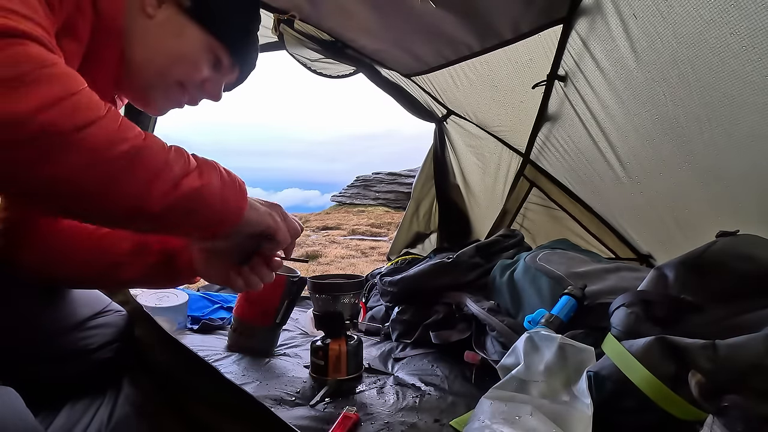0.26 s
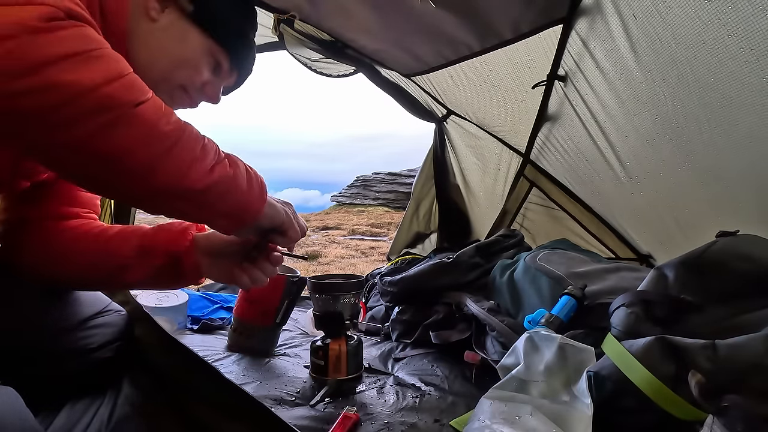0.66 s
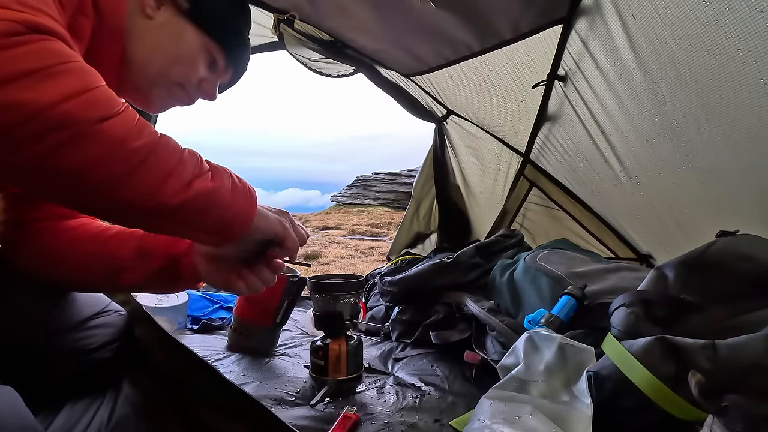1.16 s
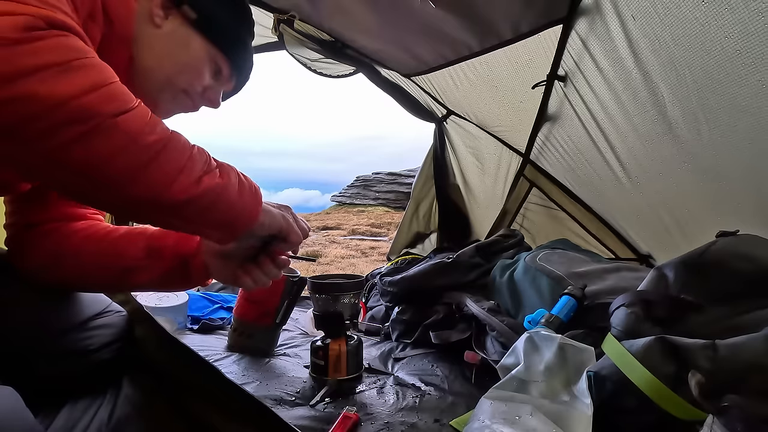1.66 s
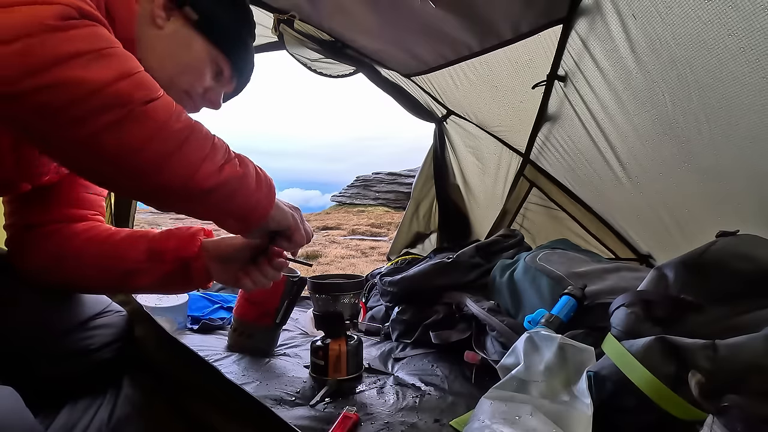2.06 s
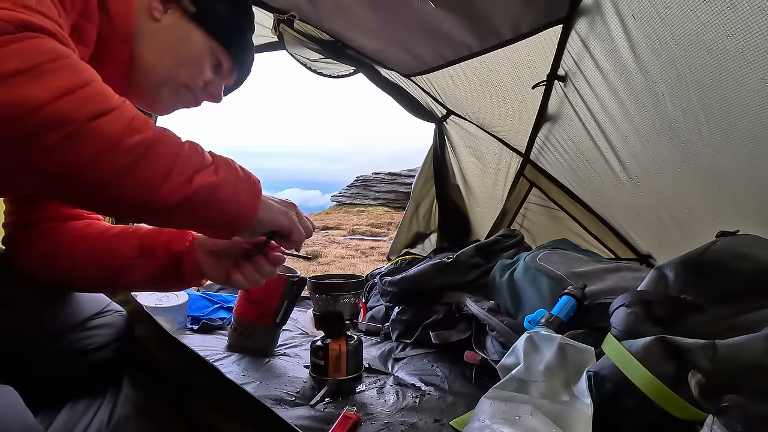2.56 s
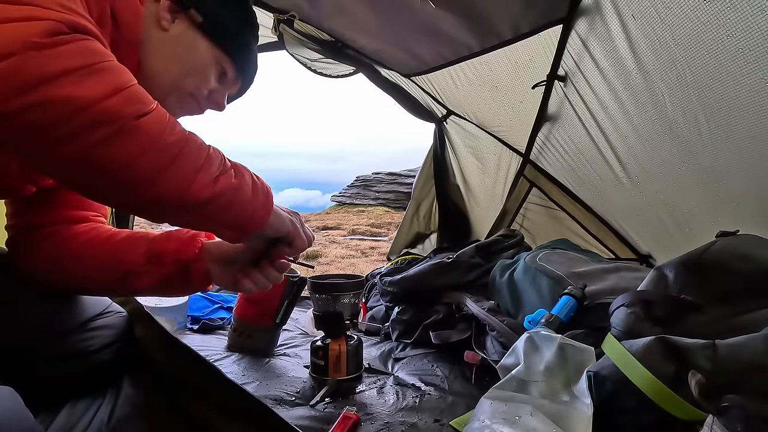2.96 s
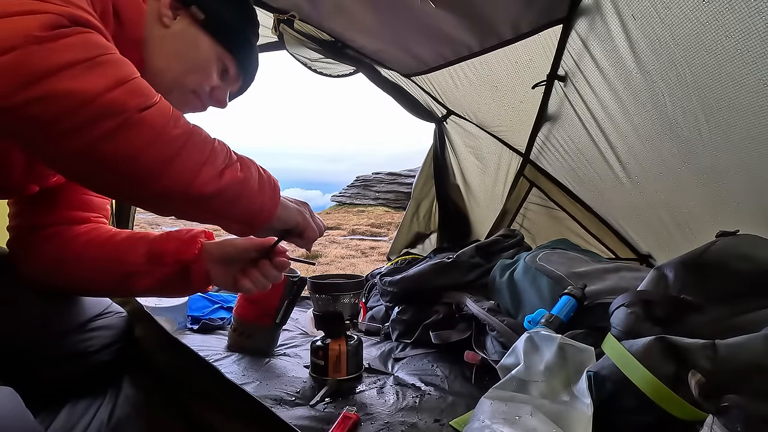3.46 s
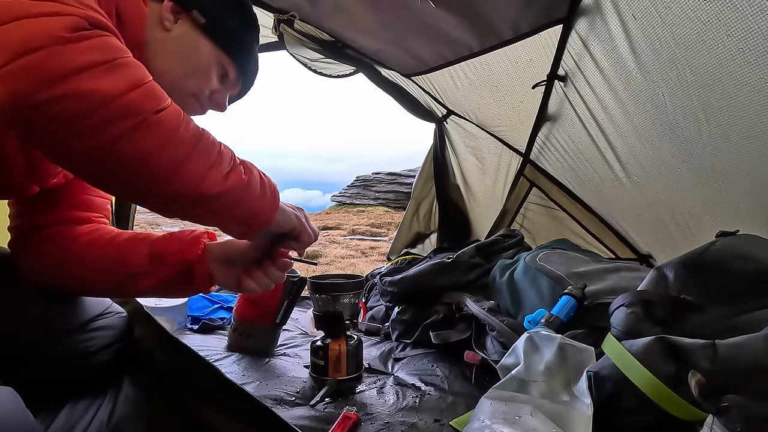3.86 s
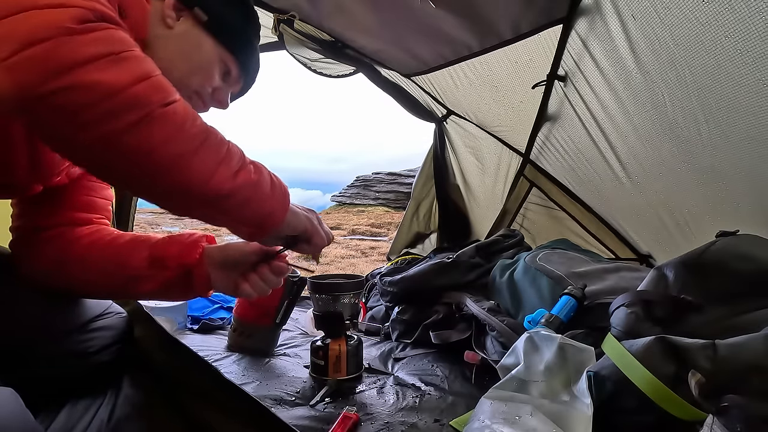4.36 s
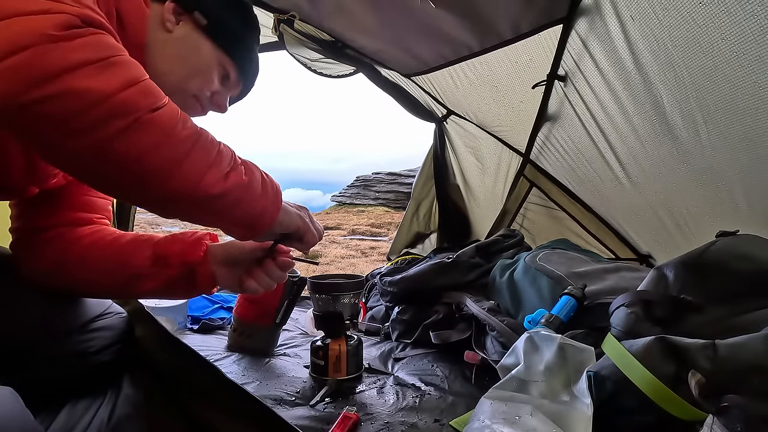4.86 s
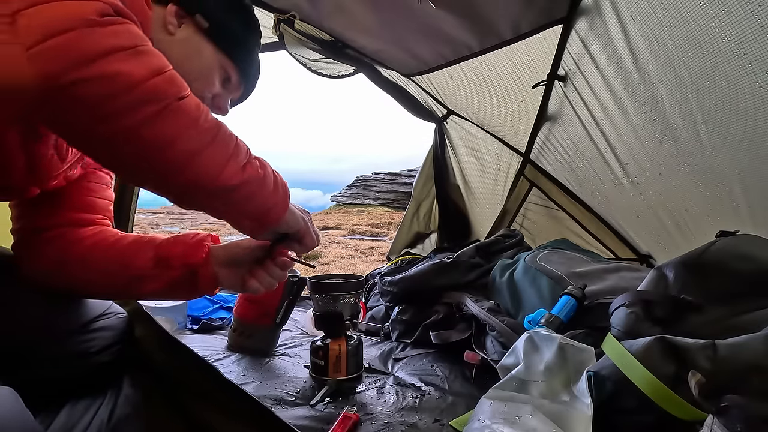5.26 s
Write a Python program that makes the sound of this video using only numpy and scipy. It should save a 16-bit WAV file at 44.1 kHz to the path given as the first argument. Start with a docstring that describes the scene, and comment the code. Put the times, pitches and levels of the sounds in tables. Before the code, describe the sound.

A close, dry recording in a small tent. Faint steady hiss, like escaping gas with a slightly whistly colour around five kilohertz, runs throughout, over weak low wind rumble and soft drumming fabric that rise and fall. A tiny click comes at 0.3 s. At 0.77 s a striker scrapes a rod for about a tenth of a second: a rough, chattering metallic zip with grit. Knocks follow at 1.3 s, with a faint one at 1.9 s. A harsher, very short scrape comes at 2.3 s, then a clear steel tick at 2.8 s. Light ticks lead into the third scrape at 3.3 s, which ends in a bright, loud snap at 3.38 s. A small tick sounds at 3.7 s. The fourth scrape, at 4.3 s, is softer and peppered with clicks; handling ticks follow at 4.8 and 5.06 s. The last, strong gritty scrape at 5.44 s ends with the loudest crack at 5.49 s.

```python
"""Ferro rod scraped over an unlit burner

A steel striker scrapes five times along a ferro rod in a tent: stick-slip friction rings the pressed steel,
fracture of the rod throws off grit, and the burning shavings puff as sparks.
Knocks, before, during and after the strokes, are impulses that ring damped modes of striker and rod.
Gas hisses throughout as jet noise coloured by resonances, and wind rumbles and drums on the tent."""
import sys
import numpy as np
from scipy import signal
from scipy.fft import rfft, irfft
from scipy.io import wavfile

SR = 44100
rng = np.random.default_rng(int(sys.argv[2]) if len(sys.argv) > 2 else 0)


def generate_wav(sig):
    """Save sig (samples, or channels by samples) to the path in sys.argv[1] as 16-bit PCM at SR."""
    pcm = np.round(np.clip(np.atleast_2d(sig).T, -1, 1) * 32767).astype(np.int16)
    wavfile.write(sys.argv[1], SR, pcm)


N = 242550
TIME = np.arange(N) / SR
BINS = np.maximum(np.arange(N // 2 + 1) * SR / N, 1)   # bin frequencies in Hz, kept above 0 for the logarithm

# a stroke bites, gathers speed and loses pressure; levels are relative within each layer:
# (start [s], share of full speed at the bite [0-1], full speed [s], easing off [s],
#  time for the pressure to fall 20 dB [s], chatter [dB], centre of the chatter at full speed [Hz],
#  grit [dB], flare [dB])
STROKES = [(0.769, .27, 0.825, 0.875, 0.0327, -28.5, 2120, -38, -48.5),
           (2.281, .21, 2.328, 2.335, 0.012, -21.5, 2400, -26, -37),
           (3.293, .29, 3.346, 3.3773, 0.0009, -26, 2270, -31.5, -43.5),
           (4.311, .45, 4.346, 4.384, 0.07, -30.5, 2380, -39, -45),
           (5.444, .48, 5.488, 5.46, 0.12, -21.5, 2340, -22.5, -38.5)]
# the edge catches hard and lets go: (time [s], relative level [dB], pitch of the ring [Hz], swell [s])
CATCHES = [(0.816, -23.5, 2080, .0019), (0.8425, -22, 2000, .0012), (0.8637, -16.5, 2170, .001),
           (0.870, -24, 2520, .0014), (0.911, -30, 2290, .0011), (2.3265, -14, 2340, .0016),
           (2.3316, -8.5, 2420, .0014), (4.2985, -26.5, 2400, .0007), (4.3383, -23, 2150, .0008),
           (5.4492, -22.5, 2393, .0007), (5.4814, -18, 2310, .002)]
# steel knocks on the rod, or snaps off its tip:
# (time [s], relative level [dB], place from shaft to tip [0-1], brightness [dB per octave])
KNOCKS = [(0.2897, -33, .3, -8), (0.8748, -26.5, 0.91, 11), (1.279, -26, .1, 1), (1.3192, -17.5, .8, -1),
          (1.8714, -35, 0.094, -10.5), (2.827, -13, 0.051, 1.5), (2.9075, -27.5, .05, 2),
          (3.2432, -30, .1, -6.5), (3.2661, -26.5, .1, -6), (3.337, -15, .1, 0.5), (3.3813, -3, 0.852, 2.5),
          (3.7323, -28, .3, -1), (4.3289, -16, .1, -3.5), (4.3455, -18.5, .1, -1.5),
          (4.3569, -17.5, 0.049, -1), (4.374, -19.5, 0.0514, 6), (4.4283, -28, .2, 7),
          (4.819, -29, 0.0508, 4), (5.0624, -20, .35, -6.5), (5.4406, -24, .1, -3),
          (5.4919, -1.5, 0.983, -2)]
# modes of striker and rod, damped by the fingers: (frequency [Hz], relative level [dB], decay by 60 dB [s])
STEEL_MODES = [(1865, 2.5, 0.00556), (2297, -1, 0.0134), (2681, -1, 0.00697), (3618, 4.5, 0.0098),
               (4166, 5, 0.0062), (5258, 4.5, 0.00497), (6050, 2.5, 0.00625), (7110, 0.5, 0.0206),
               (7388, 3, 0.00827), (8637, -0.5, 0.00707), (9960, -13, .008)]
# resonances of the striker pressed on the rod: (frequency [Hz], width [Hz], relative level [dB])
PRESSED_MODES = [(1836, 248, -6), (2112, 157, 0), (2282.5, 158, -0.5), (2556.6, 100, 0.5), (2955, 85, -2)]
# relative level of a knock's ring in four bands, near 2, 4, 5.5 and 8 kHz, on the shaft and at the tip: (level [dB])
SHAFT_RING_DB = [-12, -16, -7, -21.5]
TIP_RING_DB = [-17.5, -14, -20.5, -14]
# colour of a knock as the microphone in its housing picks it up: (frequency [Hz], gain [dB])
KNOCK_COLOUR = [(400, -34.5), (800, -12), (1300, 1.5), (2000, 0), (2800, 3), (3200, -5.5), (3600, 0),
                (6000, -1), (9500, -0.5), (11100, -3), (12500, -5), (16000, -10.5)]
# chips tearing off the rod: (frequency [Hz], relative density [dB per Hz])
GRIT_SPECTRUM = [(1200, -26), (2200, -19), (2800, 0.5), (3200, -2.5), (3700, -0.5), (4800, -2), (5900, 2),
                 (7200, -2), (8900, -8), (10150, -3.5), (11100, -16.5), (14000, -22), (16000, -44)]
# sparks burning: (frequency [Hz], relative density [dB per Hz])
FLARE_SPECTRUM = [(60, -13.5), (230, -5), (350, 3), (600, -1), (780, -6), (960, 4), (1450, -0.5),
                  (2000, 6.5), (3200, -25), (8000, -56.5)]
# the gas jet: (frequency [Hz], relative density [dB per Hz])
JET_SPECTRUM = [(150, -10), (450, -25), (650, -18.5), (860, -31.5), (1050, -15.5), (1400, -1), (1850, -12),
                (3000, -12), (4200, -8.5), (6400, -11.5), (9500, -17), (10600, -22), (11100, -30),
                (15500, -42.5)]
# resonances colouring the hiss, from burner and microphone housing:
# (frequency [Hz], width [Hz], height of each alone above the hiss [dB])
HISS_RESONANCES = [(1346, 800, 2.5), (2146, 260, 8), (2790, 178, 4), (3678, 101, 5), (4676.6, 392, 12),
                   (4983, 204.5, 16.5), (5298.5, 84.4, 19), (5502, 248, 12), (5919, 141, 8),
                   (6565, 156, 3.5), (7160, 181, 13.5), (7774, 282, 10.5), (11680, 400, 7),
                   (12160, 500, 5.5)]
# strength of the wind: (time [s], relative deep rumble [dB], relative drumming of the fabric [dB])
WIND_STRENGTH = [(0.0, -54, -49), (0.21, -50, -54), (0.5, -61, -54), (0.58, -50, -45), (1.85, -50, -49),
                 (1.87, -55, -55), (2.39, -50, -51), (2.65, -61, -63), (3.45, -56, -54), (4.01, -64, -63),
                 (4.47, -57, -55), (4.73, -64, -63), (5.44, -50, -53), (5.5, -51, -45)]
# gusts pressing on the tent: (frequency [Hz], relative density [dB per Hz])
RUMBLE_SPECTRUM = [(10, 0.5), (25, 1.5), (50, 2.5), (70, -9), (120, -30), (500, -89)]
# the drumming fabric: (frequency [Hz], relative density [dB per Hz])
FABRIC_SPECTRUM = [(45, -11.5), (62, 0), (79, 1), (110, -6), (180, -14.5), (260, -31), (450, -49),
                   (1000, -65)]
# stereo width of gas, wind and thumps: (frequency [Hz], side against mid [dB])
WIDTH = [(25, -15), (60, -41), (150, -11.5), (1200, -10.5), (2300, -26.5), (5000, -17), (8000, -22),
         (13000, -6.5)]
# the two microphone ports: (frequency [Hz], lag of the left [rad], left minus right [dB])
PORTS = [(100, 0.17, 0.5), (613, 0.645, -2.5), (1420, 0.1, -1), (2310, 0.693, 0.24), (3320, 0.86, -1.43),
         (4260, 0.497, -0.23), (5400, 0.533, -1.3), (7900, 0.44, 0), (13000, 0.85, 1.5)]

# each layer grows as this power of the speed, and dies as this power of the pressure
CHATTER_POWER, GRIT_POWER, FLARE_POWER = 0.597, 1.187, 1.127
CHATTER_FALL, GRIT_FALL, FLARE_FALL = 1.38, 0.93, 1.16
BITE_S = .007   # the pressure builds up this fast
CENTRE_RISE_HZ = 200   # climb of the chatter's centre from rest to full speed
SIZZLE_HZ = 6500   # above this the rasp needs speed most
PIVOT_HZ = 4130   # brightness tilts the ring of a knock about this frequency
CLACK_HZ, CLACK_DB, CLACK_T60_S = 950, -12, .006   # low clack at the very tip, relative to its knock
THUMP_DB, THUMP_S = -50, .028   # soft thump as a stroke eases off
CUTOFF_HZ = 15750


def from_db(db):
    """Logarithmic level: decibels to amplitude gain."""
    return 10 ** (np.asarray(db) / 20)


def rms_one(x):
    """Power normalisation: scale to rms 1."""
    return x / np.sqrt(np.mean(x ** 2) + 1e-20)


def over_hz(points):
    """Logarithmic frequency scale: interpolate a curve to every frequency bin."""
    hz, values = np.transpose(points)
    return np.interp(np.log(BINS), np.log(hz), values)


def colour(x, db):
    """Minimum-phase filtering: the folded cepstrum gives a causal filter with the given dB at each bin."""
    cepstrum = irfft(np.log(from_db(db)), N)
    cepstrum[1:N // 2] *= 2
    cepstrum[N // 2 + 1:] = 0
    impulse_response = irfft(np.exp(rfft(cepstrum)), N)[:N // 8]
    # zero padding keeps the convolution from wrapping round
    return irfft(rfft(x, 2 * N) * rfft(impulse_response, 2 * N))[..., :N]


def drift(rate):
    """Slow random fluctuation: chance values at this rate per second, joined by lines; rms 1."""
    knots = rng.standard_normal(N // 10)
    return rms_one(np.interp(TIME * rate, np.arange(len(knots)), knots))


def wide_noise(db):
    """Partial coherence: mid and side noise of one spectrum, with a width set by frequency; rms 1."""
    mid, side = rfft(rng.standard_normal((2, N)))
    left_right = mid + side * from_db(over_hz(WIDTH)) * [[1], [-1]]
    return rms_one(irfft(left_right * from_db(db), N))


def ring(clicks, hz, t60):
    """Damped resonance: a unit click sets a mode ringing at a height of about 1."""
    radius = from_db(-60 / (t60 * SR))
    angle = 2 * np.pi * hz / SR
    return signal.lfilter([.5, 0, -.5], [1, -2 * radius * np.cos(angle), radius ** 2], clicks + 1e-18)


def clicks_at(times, sizes):
    """Impulse excitation: single clicks at the given times."""
    out = np.zeros(N)
    samples = np.round(np.asarray(times) * SR).astype(int)
    out[np.clip(samples, 0, N - 1)] = sizes
    return out


def stroke_controls():
    """Frictional drive: power laws of speed and pressure set the gains, and speed raises the chatter."""
    gains, speed, centre_hz = np.zeros((3, N)), np.zeros(N), np.zeros(N)
    rises = np.array([[CHATTER_POWER], [GRIT_POWER], [FLARE_POWER]])
    falls = np.array([[CHATTER_FALL], [GRIT_FALL], [FLARE_FALL]])
    for start, bite, full, ease, fade_s, chatter_db, hz, grit_db, flare_db in STROKES:
        on = (TIME >= start) & (TIME < ease + 5 * fade_s)
        t = TIME[on]
        speed[on] = bite ** np.interp(t, [start, full], [1, 0])
        build_up = np.minimum((t - start) / BITE_S, 1)
        pressure = build_up * from_db(-20 * np.maximum(t - ease, 0) / fade_s)
        levels = from_db([[chatter_db], [grit_db], [flare_db]])
        gains[:, on] = levels * speed[on] ** rises * pressure ** falls
        centre_hz[on] = hz - CENTRE_RISE_HZ * (1 - speed[on])
    return (*gains, speed, centre_hz)


def slips(speed, slow_per_s, fast_per_s, jitter, uneven_db):
    """Stick-slip friction: irregular jerks come faster as the striker gathers speed; rms 1."""
    per_s = (slow_per_s + (fast_per_s - slow_per_s) * speed) * np.exp(jitter * drift(200))
    jumps = np.diff(np.floor(np.cumsum(per_s) / SR), prepend=0)
    sizes = from_db(uneven_db * rng.standard_normal(N))
    return rms_one(jumps * sizes / np.sqrt(per_s))   # the root evens out the power over the rates


def chatter(jerks, speed, centre_hz, drag_db, reach_hz):
    """Forced resonance: slips and drag ring the striker; the grip picks which resonances speak."""
    force = jerks + from_db(drag_db) * speed * rng.standard_normal(N)
    shares, rings = [], []
    for k, (hz, width, db) in enumerate(PRESSED_MODES):
        shares.append(from_db(db) / (1 + ((hz - centre_hz) / reach_hz) ** 2))
        t60 = np.log(1000) / (np.pi * width)
        rings.append((-1) ** k * rms_one(ring(force, hz, t60)))
    return np.sum(np.array(shares) * rings, axis=0) / np.linalg.norm(shares, axis=0)


def grit(jerks, per_s, spread_db, hiss_db, burst_db, burst_s):
    """Brittle fracture: chips break off in a dense random stream, with a short burst at every slip; rms 1."""
    sizes = from_db(spread_db * np.minimum(rng.exponential(1, N), 4)) * rng.choice([-1, 1], N)
    chips = rms_one(sizes * (rng.random(N) < per_s / SR))
    chips += from_db(hiss_db) * rng.standard_normal(N)
    bursts = rms_one(signal.lfilter([1], [1, -np.exp(-1 / (burst_s * SR))], jerks + 1e-18))
    return rms_one(colour(chips * (1 + from_db(burst_db) * bursts), over_hz(GRIT_SPECTRUM)))


def nicks(jerks, uneven_db):
    """Impulsive excitation: every slip ticks the steel modes, a few much harder than the rest; rms 1."""
    hits = jerks * from_db(uneven_db * np.minimum(rng.exponential(1, N), 2.5))
    out = np.zeros(N)
    for k, (hz, db, t60) in enumerate(STEEL_MODES):
        out += (-1) ** k * from_db(db) * ring(hits, hz, t60)
    return rms_one(colour(out, over_hz(KNOCK_COLOUR)))


def dulled(x, speed):
    """Speed-dependent brightness: a slow edge throws less treble."""
    body = signal.sosfilt(signal.butter(1, SIZZLE_HZ, fs=SR, output="sos"), x)
    return body + (x - body) * speed


def flare():
    """Combustion noise: the shavings burn with a soft puff of coloured noise; rms 1."""
    return rms_one(colour(rng.standard_normal(N), over_hz(FLARE_SPECTRUM)))


def catches():
    """Transient oscillation: a hard catch of the pressed striker swells and dies within a few cycles."""
    out = np.zeros(N)
    for s, db, hz, swell_s in CATCHES:
        at = int(s * SR)
        t = TIME[:min(N - at, SR // 20)]
        swell = (t / swell_s * np.exp(1 - t / swell_s)) ** 2
        out[at:at + len(t)] += from_db(db) * swell * np.sin(2 * np.pi * hz * t)
    return out


def knocks(crack_db):
    """Modal impact: a hard crack rings the steel modes, balanced by place and brightness."""
    s, level, place, brightness = np.transpose(KNOCKS)
    out = clicks_at(s, from_db(level + crack_db))
    out += ring(clicks_at(s, from_db(level + CLACK_DB) * place ** 4), CLACK_HZ, CLACK_T60_S)
    for k, (hz, db, t60) in enumerate(STEEL_MODES):
        band = np.searchsorted([3100, 4600, 6500], hz)   # band edges in Hz
        balance = (1 - place) * SHAFT_RING_DB[band] + place * TIP_RING_DB[band]
        balance += brightness * np.log2(hz / PIVOT_HZ)
        out += (-1) ** k * ring(clicks_at(s, from_db(level + balance + db)), hz, t60)
    return colour(out, over_hz(KNOCK_COLOUR))


def tent(x, echo_db, t60, apart_db):
    """Diffuse reflection: hands, pot and fabric scatter a brief spray, a little different at each ear."""
    t = TIME[:SR // 8]
    decay = from_db(-60 * t / t60) * (t > .0007)   # the first reflection comes after 0.7 ms
    mid, side = rng.standard_normal((2, len(t))) * decay
    spray = (mid + from_db(apart_db) * side * [[1], [-1]]) / np.sqrt(np.sum(mid ** 2))
    return x + from_db(echo_db) * signal.fftconvolve(x[None], spray, axes=1)[:, :N]


def gas(level_db, waver_db):
    """Jet noise: turbulent hiss is coloured by resonances of burner and microphone housing."""
    power = 1
    for hz, width, db in HISS_RESONANCES:
        power = power + (from_db(db) ** 2 - 1) / (1 + (2 * (BINS - hz) / width) ** 2) ** 2
    spectrum = over_hz(JET_SPECTRUM) + 10 * np.log10(np.maximum(power, .1))
    return from_db(level_db + waver_db * drift(3.543)) * wide_noise(spectrum)


def ports(x):
    """Phase and level difference: the housing delays and shades the sound differently at its two ports."""
    hz, lag, tilt_db = np.transpose(PORTS)
    shade = from_db(over_hz(np.c_[hz, tilt_db]) / 2)
    half = shade * np.exp(-.5j * over_hz(np.c_[hz, lag]))   # each port takes half the difference
    return irfft(rfft(x) * np.array([half, 1 / half]), N)


def thumps():
    """Structural coupling: the arm shakes the fabric around the moment each stroke begins to ease off."""
    swells = sum(np.exp(-((TIME - ease) / THUMP_S) ** 2) for start, bite, full, ease, *rest in STROKES)
    return from_db(THUMP_DB) * swells * wide_noise(over_hz(FABRIC_SPECTRUM))


def wind(rumble_db, fabric_db, lumps_db, flutter_db):
    """Turbulent pressure: gusts press on the tent in deep lumps and set its fabric drumming."""
    s, deep, drumming = np.transpose(WIND_STRENGTH)
    deep_db = np.interp(TIME, s, deep) + rumble_db + lumps_db * drift(8.7)
    drum_db = np.interp(TIME, s, drumming) + fabric_db + flutter_db * drift(10)
    rumble = from_db(deep_db) * wide_noise(over_hz(RUMBLE_SPECTRUM))
    return rumble + from_db(drum_db) * wide_noise(over_hz(FABRIC_SPECTRUM))


def scene():
    """Superposition: strokes and knocks close to the burner, with wind all around."""
    chatter_gain, grit_gain, flare_gain, speed, centre_hz = stroke_controls()
    jerks = slips(speed, slow_per_s=120, fast_per_s=210, jitter=.27, uneven_db=2.5)
    scrape = from_db(-2.5) * chatter_gain * chatter(jerks, speed, centre_hz, drag_db=-6, reach_hz=420)
    chips = grit(jerks, per_s=2500, spread_db=5.0, hiss_db=4.5, burst_db=-6.5, burst_s=0.0014)
    rasp = from_db(-2) * grit_gain * chips
    rasp += from_db(-16) * chatter_gain * nicks(jerks, uneven_db=3)
    scrape += dulled(rasp, speed)
    scrape += from_db(4.5) * flare_gain * flare()
    scrape += from_db(-0.5) * catches()
    near = tent(scrape, echo_db=-6, t60=0.0292, apart_db=-13)
    near += tent(knocks(crack_db=-11.5), echo_db=-6.5, t60=0.0364, apart_db=-10.5)
    near += gas(level_db=-42.5, waver_db=0.4966)
    return ports(near) + thumps() + wind(rumble_db=0.3, fabric_db=-1.2, lumps_db=1.5, flutter_db=2.6)


def record(dry):
    """Band limitation: an elliptic low-pass cuts the top steeply."""
    return signal.sosfilt(signal.ellip(10, .2, 80, CUTOFF_HZ, fs=SR, output="sos"), dry)


dry = scene()
out = record(dry)
generate_wav(out)
```